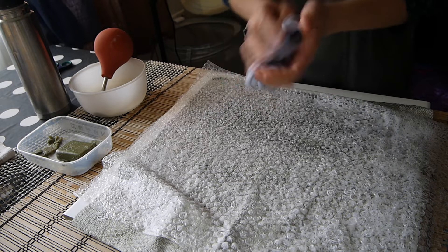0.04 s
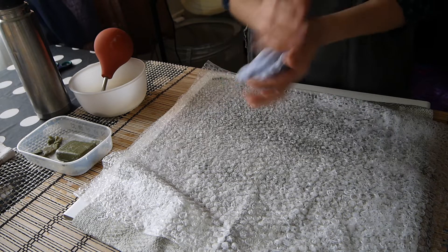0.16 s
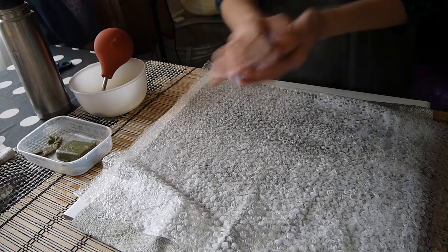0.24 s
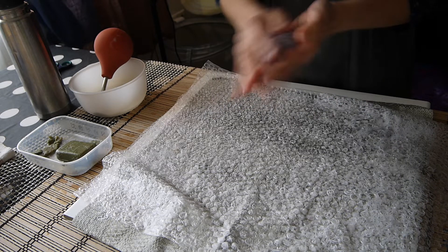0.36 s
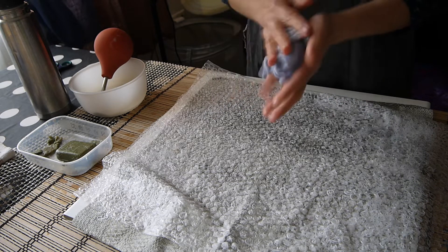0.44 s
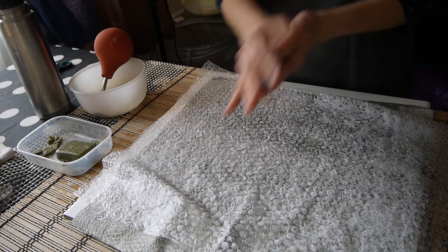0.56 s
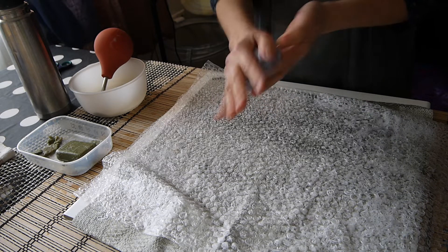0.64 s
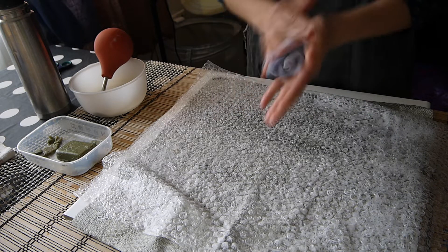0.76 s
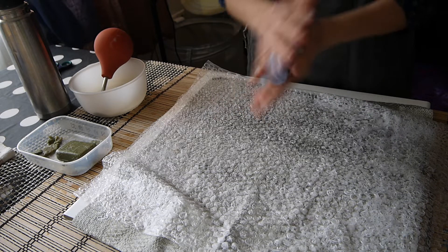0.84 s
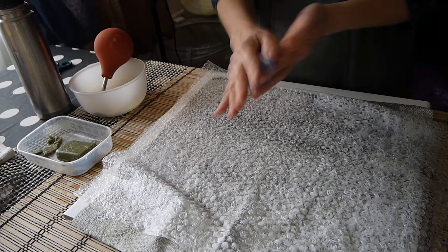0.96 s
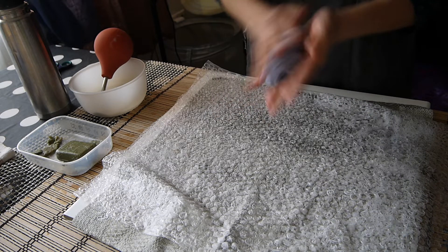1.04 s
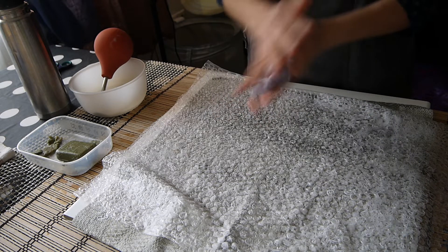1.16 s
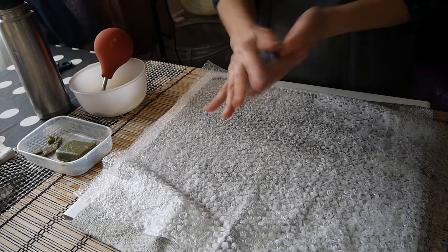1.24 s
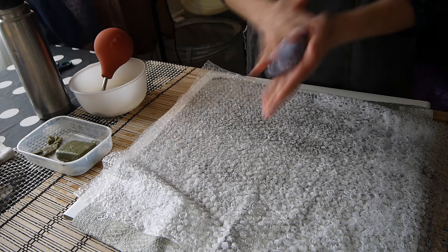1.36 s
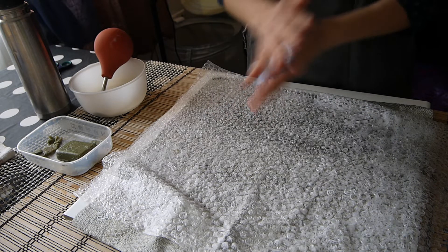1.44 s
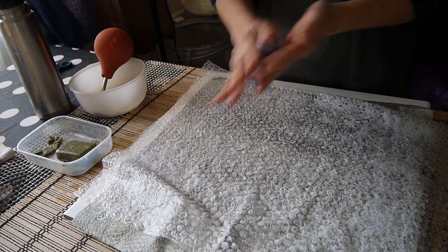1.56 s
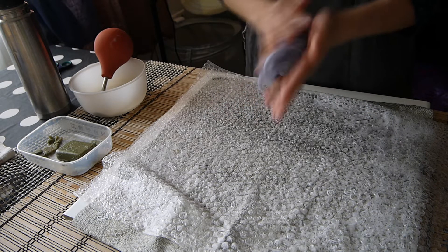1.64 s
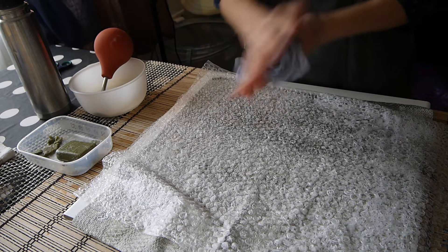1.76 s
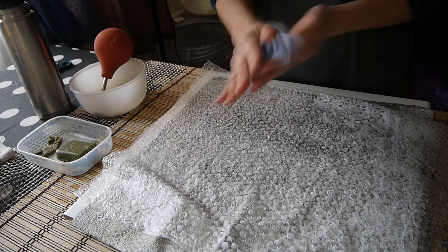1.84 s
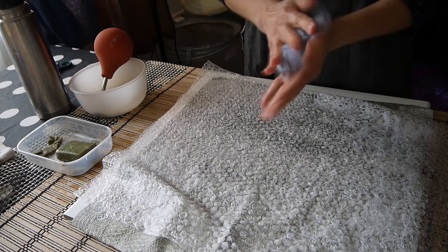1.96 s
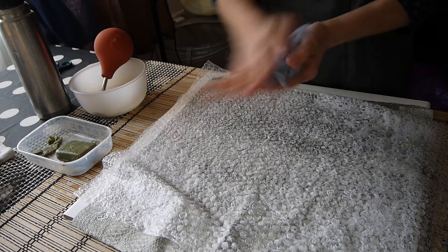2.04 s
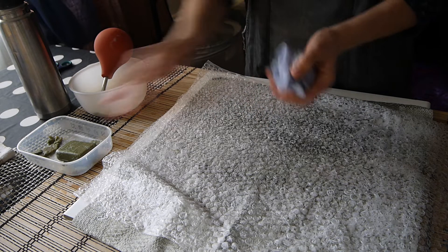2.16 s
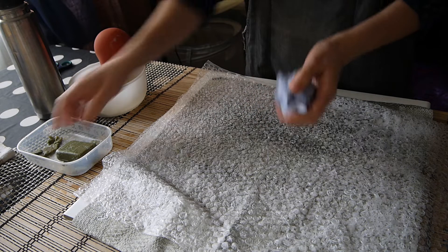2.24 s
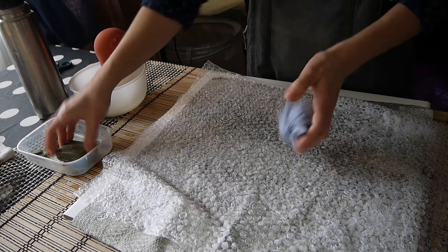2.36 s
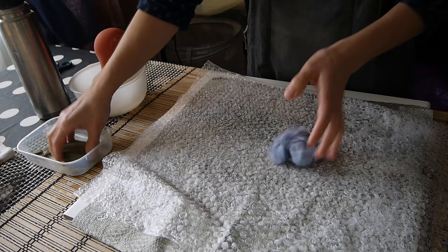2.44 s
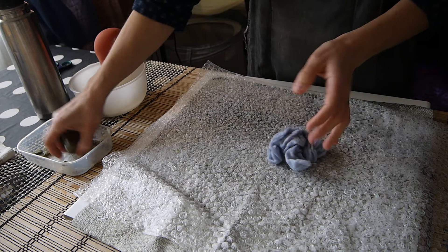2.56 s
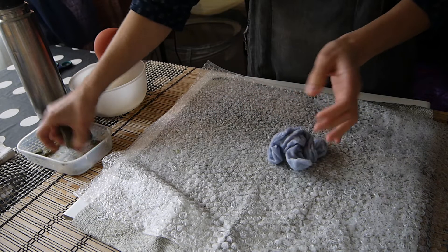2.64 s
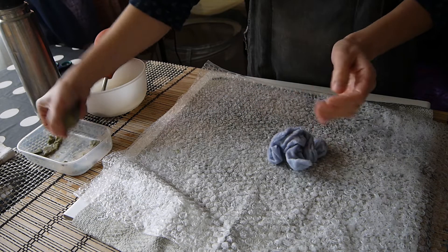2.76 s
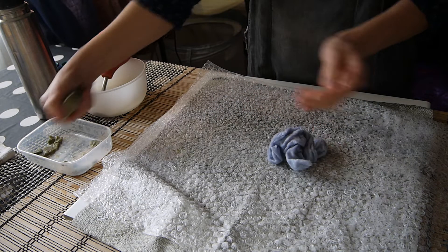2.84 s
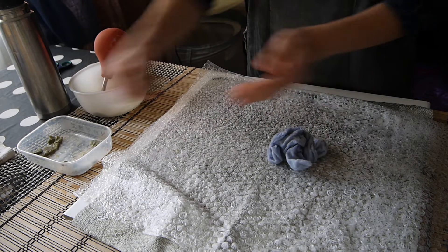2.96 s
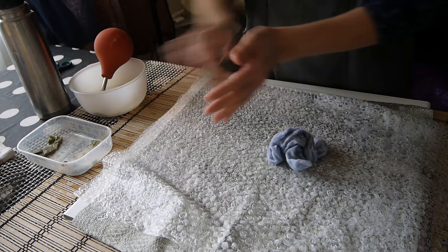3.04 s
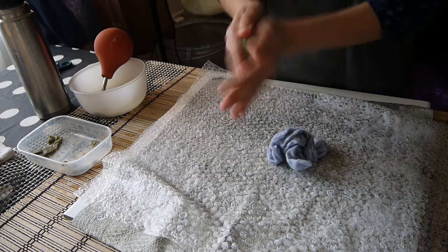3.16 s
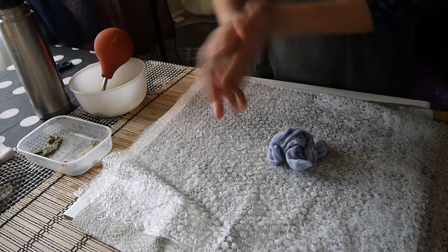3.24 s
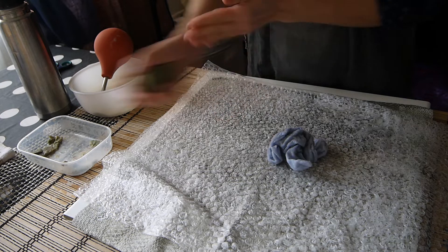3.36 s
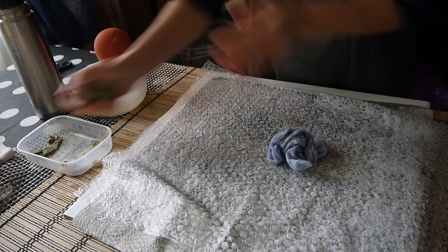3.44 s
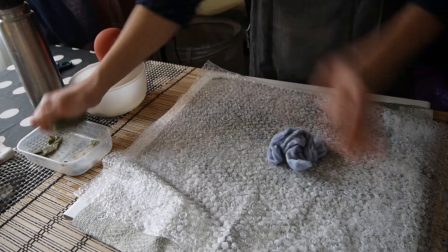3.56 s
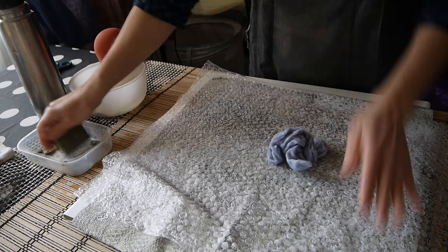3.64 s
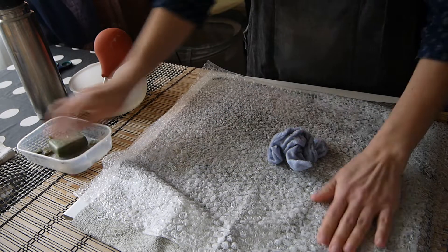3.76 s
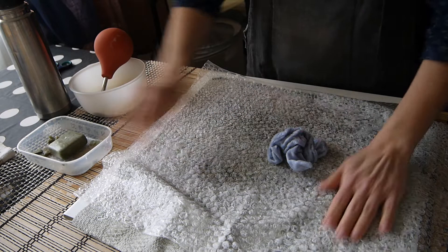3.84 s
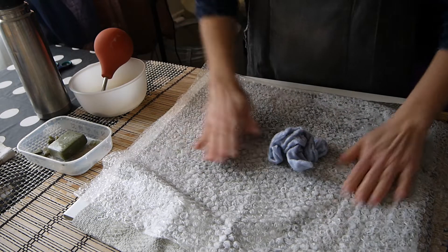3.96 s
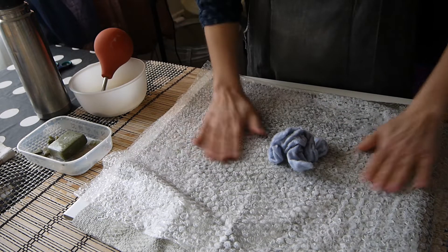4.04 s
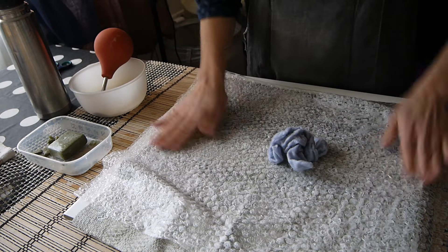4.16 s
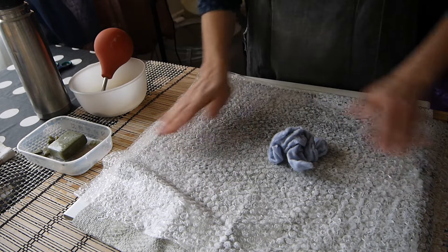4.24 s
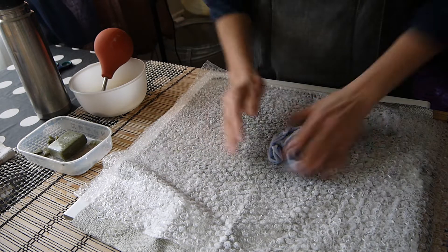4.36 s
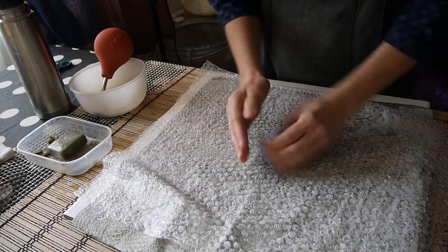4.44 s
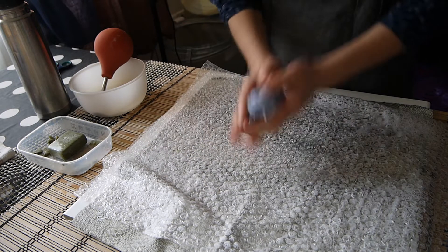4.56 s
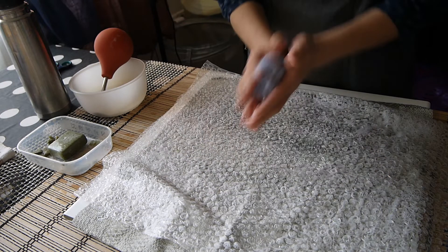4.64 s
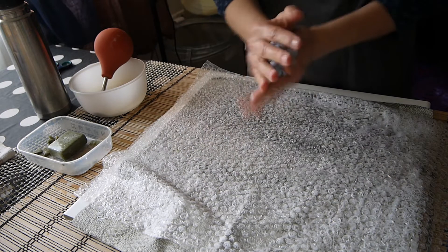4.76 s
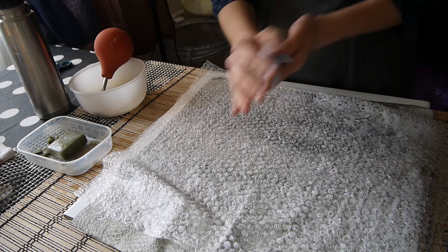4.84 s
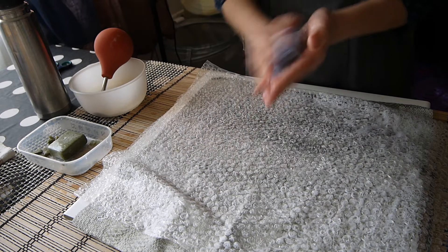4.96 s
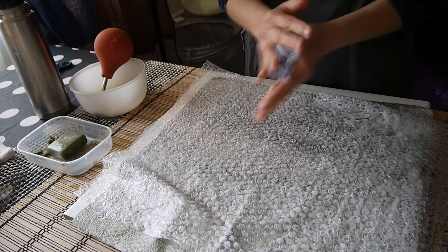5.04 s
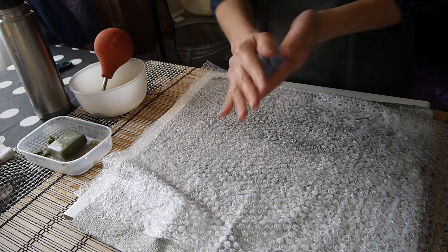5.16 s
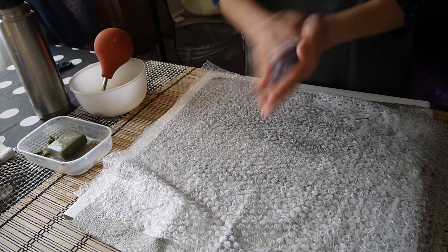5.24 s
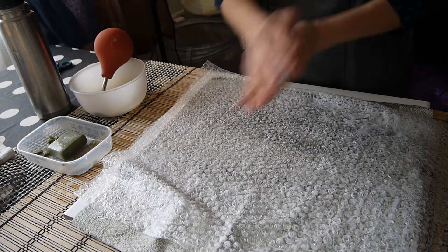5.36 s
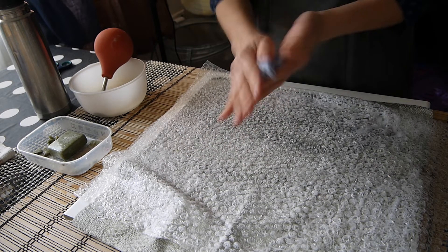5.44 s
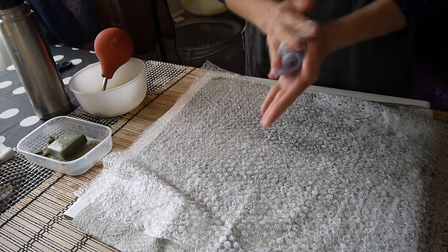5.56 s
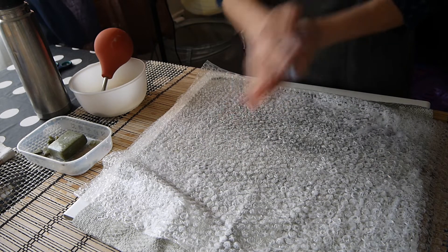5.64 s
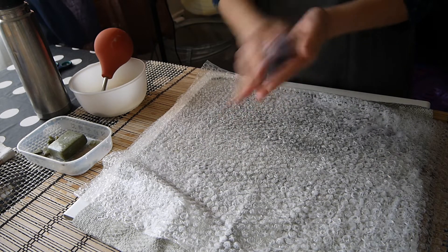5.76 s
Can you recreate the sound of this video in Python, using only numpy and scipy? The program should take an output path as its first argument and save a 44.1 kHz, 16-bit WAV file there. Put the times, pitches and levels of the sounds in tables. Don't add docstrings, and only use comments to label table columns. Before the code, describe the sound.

In a quiet room, close stereo microphones catch soapy palms rolling wet wool in quick soft hisses. Soap is lifted from a thin plastic dish on the left with small hollow knocks, lathered gently, then dropped back with a loud bouncing clatter and table thud. Palms brush a dry towel, then the quick rubbing returns over faint room tone.

```python
import sys
import numpy as np
from scipy import signal
from scipy.fft import rfft, irfft
from scipy.io import wavfile

SR = 44100
rng = np.random.default_rng(int(sys.argv[2]) if len(sys.argv) > 2 else 0)


def level_to_linear(level):
    exponent = np.asarray(level, float) / 20
    return 10 ** exponent


def transcribe(u):
    v = np.clip(np.atleast_2d(u).T, -1, 1)
    q = np.round(v * 32767).astype(np.int16)
    wavfile.write(sys.argv[1], SR, q)


N = 255339


def rms_one(x):
    return x / np.sqrt(np.mean(x ** 2) + 1e-20)


def at_hz(points, hz):
    table_hz, value = np.array(points).T
    return np.interp(np.log(hz), np.log(table_hz), value)


def filtered(x, order, hz, kind="low"):
    return signal.sosfilt(signal.butter(order, hz, kind, fs=SR, output="sos"), x)


def drift(rate):
    r = np.exp(-80 * np.pi * rate / SR)
    noise = rng.standard_normal(N // 40 + 2002)
    slow = signal.lfilter([1], [1, -2 * r, r * r], noise)[2000:]
    return np.interp(np.arange(N) / 40, np.arange(len(slow)), rms_one(slow))


def colour(x, spectrum):
    hz = np.maximum(np.arange(N // 2 + 1) * SR / N, 5)
    return rms_one(irfft(rfft(x) * level_to_linear(at_hz(spectrum, hz)), N))


def resonate(x, hz, width_hz):
    r = np.exp(-np.pi * width_hz / SR)
    poles = [1, -2 * r * np.cos(2 * np.pi * hz / SR), r * r]
    return signal.lfilter([(1 - r * r) / 2, 0, (r * r - 1) / 2], poles, x + 1e-18)


def grains(per_s, spread_db, clump_db):
    sizes = level_to_linear(spread_db * np.minimum(rng.exponential(1, N), 5)) * rng.choice([-1, 1], N)
    chance = per_s * level_to_linear(clump_db * drift(40)) / SR
    return sizes * (rng.random(N) < chance)


def burst(s, level_db, decay_ms, first=0.):
    out = np.zeros(N)
    start = round((s + .0008) * SR)
    t = np.arange(min(2000, N - start)) / SR
    chatter = rng.standard_normal(2000)[:len(t)]
    chatter[0] = first
    out[start:start + len(t)] = level_to_linear(level_db) * chatter * np.exp(-t * 1000 / max(decay_ms, .2))
    return out


def swing(s, db, hz, ms, rise_ms):
    out = np.zeros(N)
    start = round(s * SR)
    t = np.arange(4000) / SR
    envelope = np.exp(-t * 1000 / ms) * (1 - np.exp(-t * 1000 / rise_ms))
    out[start:start + len(t)] = level_to_linear(db) * np.sin(2 * np.pi * hz * t) * envelope
    return out


def swells(s, db, attack_ms, hold_ms, release_ms, sag_db=0.):
    power = 1e-12
    for at, top_db, rise, hold, fall in np.broadcast(s, db, attack_ms, hold_ms, release_ms):
        ms = 1000 * (np.arange(N) / SR - at)
        lost_db = 20 * (np.maximum(-ms, 0) / rise) ** 2
        lost_db += np.maximum(ms - hold, 0) * 20 / fall
        lost_db += np.clip(ms, 0, hold) * sag_db / 1000
        power = power + level_to_linear(2 * (top_db - lost_db))
    return np.sqrt(power)


def place(mid, side):
    return np.array([mid + side, mid - side])


def lean(db):
    return level_to_linear(np.array([[db], [-db]]) / 2)


# (middle [s], half length [ms], lather hiss [dB], pressure [dB])
STROKES = [(0.01, 21, -55, -67), (0.1, 74, -55.5, -60), (0.265, 49, -55.5, -63.5), (0.42, 61, -54, -62),
           (0.595, 62, -55, -60), (0.77, 66, -54.5, -61), (0.915, 52, -55, -60), (1.08, 68, -56, -62),
           (1.22, 45, -57, -58), (1.36, 86, -56.5, -62), (1.51, 67, -55, -59.5), (1.68, 49, -55.5, -59.5),
           (1.85, 88, -55, -59), (1.99, 49, -60, -68), (2.11, 86, -58.5, -60), (4.68, 230, -63.5, -74),
           (4.84, 96, -55.5, -60.5), (5.0, 61, -57, -62), (5.14, 97, -56.5, -58.5), (5.29, 55, -56, -62.5),
           (5.409, 44, -53, -56.5), (5.57, 69, -55, -59), (5.69, 28, -51.5, -55.5),
           (5.78, 82, -55.5, -58.5)]
PALMS_PART_S, PARTING_MS = 2.148, 13


def rolling():
    s, half_ms, hiss_db, pressure_db = np.transpose(STROKES)[:, :, None]
    t = np.arange(0, N + 40, 40) / SR
    bells = np.exp(-((t - s) * 1000 / half_ms) ** 2)
    parting = level_to_linear(-40 * np.maximum(t - PALMS_PART_S, 0) * 1000 / PARTING_MS)
    bells *= np.where(s < PALMS_PART_S, parting, 1)
    gains = [np.sqrt((level_to_linear(2 * db) * bells).sum(axis=0)) for db in (hiss_db, pressure_db)]
    return [np.interp(np.arange(N) / SR, t, gain) for gain in gains]


# (frequency [Hz], level [dB per Hz])
FRICTION = [(200, -13), (400, 1.5), (800, 3), (1600, -1.5), (2600, -2.5), (4000, -15.5)]


def rub(speed, pressure, spectrum, per_s):
    fizz = rms_one(grains(per_s, 3.0, 2.2)) + 0.89 * rng.standard_normal(N)
    hiss = speed * level_to_linear(0.48 * drift(29)) * colour(fizz, spectrum)
    aside = speed * level_to_linear(-8.0) * colour(rng.standard_normal(N), spectrum)
    drag = pressure * level_to_linear(0.5 * drift(28.3)) * colour(grains(4000, 1.6, 3.0), FRICTION)
    return place(hiss + drag, aside + 0.012 * hiss + 0.082 * drag)


# (time [s], hiss [dB], attack [ms], hold [ms], release [ms per 20 dB])
SOAPING = [
    (2.894, -73, 12, 2, 23),
    (3.075, -63.5, 180, 5, 30),
    (3.089, -50.5, 2.5, 4.7, 100),
    (3.212, -54, 24.7, 175, 22),
    (3.662, -59, 34, 3.1, 24),
]
# (time [s], hiss [dB], attack [ms], hold [ms], release [ms per 20 dB])
TOWEL = [
    (4.038, -49, 100, 32, 100),
    (4.125, -44.5, 144, 26.5, 100),
    (4.17, -41, 67, 14, 65.3),
    (4.434, -54, 14.8, 58, 109),
]
# (frequency [Hz], level [dB per Hz])
LATHER = [(1470, -24), (2500, -13), (2980, -6), (3440, -7.5), (4500, -3), (4890, -0.5), (6340, -5),
          (9880, 0), (12000, -3.5), (14400, -14), (15500, -54)]
# (frequency [Hz], level [dB per Hz])
TERRY = [(1200, -23), (2000, -5.5), (3000, -3), (5000, -2.5), (7000, -7), (10200, -4.5), (12500, -12),
         (14000, -23.5), (15500, -43.5)]
SOAP_DRAG_DB, TOWEL_DRAG_DB, TIRING_DB_PER_S = -4, -4.5, 29


def hands():
    hiss, pressure = rolling()
    soap = swells(*np.transpose(SOAPING), sag_db=TIRING_DB_PER_S)
    towel = swells(*np.transpose(TOWEL), sag_db=TIRING_DB_PER_S)
    wet = rub(hiss + soap, pressure + level_to_linear(SOAP_DRAG_DB) * soap, LATHER, 9000)
    return wet + rub(towel, level_to_linear(TOWEL_DRAG_DB) * towel, TERRY, 5090)


# (time [s], peak [dB], pitch [Hz], left-right [dB])
SNAPS = [(1.512, -42, 4810, 0.0), (2.2598, -34.5, 4450, -2.5), (3.101, -41, 4700, 0.5),
         (3.21, -37.5, 4100, -2), (3.24, -39, 3340, 0.5), (3.6925, -28, 2450, 15), (2.3544, -68, 7120, 7),
         (2.452, -44, 9840, 1.5), (2.585, -42, 6720, 6), (2.8927, -41.5, 10800, 5),
         (2.9796, -54, 7950, 0.5), (3.089, -36, 7500, 0.0), (3.644, -53, 9500, 7), (3.7005, -19, 10900, 11),
         (3.709, -23, 8850, 4.5), (3.7926, -17, 8200, 9), (3.864, -19, 9300, 8), (3.883, -27, 7900, 2),
         (4.043, -33, 4120, 0.1), (4.148, -37, 5000, 0.1), (4.276, -53, 9760, -3), (4.426, -40, 3310, -2),
         (4.5006, -42, 7000, -2), (3.873, -22, 9240, 9), (5.6768, -30, 8010, -2), (5.513, -42, 7300, 0.1)]
# (time [s], peak [dB], pitch [Hz], contact [ms])
SLAPS = [(1.224, -47, 581, 8.8), (1.227, -54, 1690, 4.3), (1.499, -50, 763, 8.1), (1.513, -52, 1620, 3.6),
         (1.795, -48.5, 960, 20), (1.829, -47, 640, 4.9), (2.091, -45, 720, 3.9),
         (2.2605, -45.5, 1500, 1.6), (3.09, -48, 525, 1.1), (3.104, -43, 400, 9.7), (4.431, -40, 458, 11),
         (4.433, -56, 780, 13), (5.399, -51, 740, 13), (5.676, -60, 516, 5.2)]


def smacks():
    out = np.zeros((2, N))
    for s, db, hz, pan_db in SNAPS:
        film = burst(s, db + 0.5, 1.0, 4.6)
        snap = resonate(resonate(film, hz, .8 * hz), hz, 1.2 * hz) + .05 * film
        out += snap * lean(pan_db)
    for s, db, hz, ms in SLAPS:
        push = burst(s, db + 12, ms, 7.9)
        out += resonate(push, hz, .3 * hz) - .3 * resonate(push, 2.2 * hz, .9 * hz)
    return out


# (time [s], dish ring [dB], hold [ms], release [ms per 20 dB], splash of wet scrape [dB])
SKIDS = [
    (2.435, -51, 5.4, 42.5, -61),
    (2.474, -45, 5, 240, -49.5),
    (2.587, -40, 3.7, 51, -57.5),
    (2.692, -46, 43, 60, -74),
    (2.725, -42, 9.9, 94, -81),
    (3.713, -30, 75, 242, -34),
    (3.804, -28, 20, 97, -35.5),
    (3.855, -23.5, 7, 24, -47),
    (3.886, -29.5, 49, 49, -28.5),
    (3.96, -45, 11.5, 196, -47),
]
# (time [s], peak [dB], crack re peak [dB], contact [ms], favoured pitch [Hz])
KNOCKS = [(2.421, -29.5, -17, 4.7, 1040), (2.4495, -35, -7, 2.4, 1110), (2.4728, -24, -10, 2.3, 1410),
          (2.477, -38, -23, 1.3, 1300), (2.482, -29, -15, 2.2, 1360), (2.4844, -37, -16, 1.2, 1250),
          (2.502, -25.5, -20, 1.9, 1630), (2.5097, -28, -16, 1.3, 1500), (2.545, -33, -24, 1.5, 1400),
          (2.59, -37, -16, 2.5, 2000), (2.5966, -32, -16, 1.5, 1300), (2.5775, -31, -31, 10, 1920),
          (2.588, -27, -21, 6, 1170), (2.6719, -14, -13.5, 3.9, 1140), (2.6756, -25, -31, 2.7, 1390),
          (2.681, -16, -29, 3.8, 1150), (2.696, -33, -42, 4.6, 1150), (2.704, -22, -43, 6.7, 1370),
          (2.717, -39, -43, 2.4, 1400), (2.7217, -33, -24, 2.1, 1250), (2.734, -19.5, -24, 7.7, 1300),
          (2.74, -36, -40, 3.3, 1250), (2.77, -31.5, -45, 4.1, 1700), (3.6947, 1.5, -6, 4.6, 2080),
          (3.699, -4, -16, 0.71, 1120), (3.7, -14, -13, 2.4, 1880), (3.722, -38, -16, 4.0, 1690),
          (3.757, -17, -20, 1.3, 2000), (3.7898, 1, -26, 7.3, 890), (3.795, -4, -19, 6.2, 1410),
          (3.828, -16, -30, 4.1, 890), (3.833, -10, -36, 2.5, 885), (3.843, -18, -18, 2.3, 1100),
          (3.858, -10, -35, 6.3, 1300), (3.864, -2.5, -18, 4.7, 1940), (3.883, -9, -33, 4.7, 1620),
          (3.89, -19, -23, 7.7, 1810), (3.914, -13, -33, 3.5, 1150), (3.925, -19, -15, 4.9, 1440)]
# (frequency [Hz], width [Hz], level [dB])
DISH = [(345, 270, -13), (478, 110, -7.5), (677, 130, -9.5), (893, 110, -4.5), (1032, 68, -6.5),
        (1120, 46, 0), (1350, 100, -1.5), (1620, 69, -4.5), (1810, 140, -5.5), (2080, 270, -5.5),
        (2520, 200, -9), (3100, 260, -8), (4450, 1160, -11), (4720, 260, -9)]
# (frequency [Hz], left-right [dB])
DISH_LEAN = [(60, 1.0), (180, 4), (550, -3.5), (1650, 9), (4970, 0.5), (15000, 2.5)]
# (frequency [Hz], level [dB per Hz])
SCRAPE = [(1470, -16.5), (2500, -9), (5120, -10.5), (6900, -18), (9880, -11), (12800, -16), (14400, -47.5),
          (15500, -103)]
SKID_ATTACK_MS, SPLASH_ATTACK_MS, SPLASH_RELEASE_MS = 28, 20, 65
WET_BELOW_RING_DB, CHATTER_DB = -24.5, -7
SOAP_SOFT_HZ = 2800


def dish():
    s, ring_db, hold_ms, release_ms, splash_db = np.transpose(SKIDS)
    ring = swells(s, ring_db, SKID_ATTACK_MS, hold_ms, release_ms)
    splash = swells(s, splash_db, SPLASH_ATTACK_MS, 0, SPLASH_RELEASE_MS)
    scrape = level_to_linear(WET_BELOW_RING_DB) * ring + splash
    blows = []
    for at, db, crack_db, ms, _ in KNOCKS:
        hardness = np.clip(level_to_linear(crack_db + 20), .1, 1)
        blows.append(burst(at, db + CHATTER_DB, ms, first=8 * hardness))
    blows = np.array(blows)
    slips = ring * level_to_linear(13.5) * rms_one(grains(600, 0.59, 5.9))
    favoured_hz = np.array(KNOCKS)[:, 4]
    out = np.zeros((2, N))
    for k, (hz, width_hz, db) in enumerate(DISH):
        octaves_off = np.log2(hz / favoured_hz)
        favour = level_to_linear(9.5 - 20.2 * np.minimum(octaves_off ** 2, .6))
        mode = resonate(favour @ blows + (-1) ** k * slips, hz, width_hz)
        out += level_to_linear(db) * lean(at_hz(DISH_LEAN, hz)) * mode
    out = level_to_linear(1.0) * filtered(out, 2, SOAP_SOFT_HZ)
    cracks = sum(burst(at, db + crack_db + 4, 1.12, 4.9) for at, db, crack_db, _, _ in KNOCKS)
    cracks = filtered(cracks, 2, [2800, 7000], "band")
    wet = scrape * colour(grains(3800, 0.76, 4.5), SCRAPE)
    aside = scrape * level_to_linear(-5.0) * colour(rng.standard_normal(N), SCRAPE)
    return out + place(cracks + wet, 0.18 * (cracks + wet) + aside)


# (time [s], peak [dB], pitch [Hz], ring [ms])
WALL_NOTES = [(2.4208, -40, 1164, 5), (2.4506, -33, 1120, 2.5), (2.4733, -26.5, 1370, 2.7),
              (2.4776, -40, 1430, 7), (2.4819, -40, 1120, 5), (2.502, -40, 1620, 5),
              (2.5095, -47, 1350, 12), (2.5452, -44, 1380, 19), (2.5764, -39, 1144, 14),
              (2.5792, -31, 1950, 3), (2.5903, -37, 2110, 3), (2.6721, -21.5, 1120, 9),
              (2.6725, -28, 1350, 7.1), (2.6768, -21.5, 1840, 3), (2.697, -30, 1120, 10),
              (2.7054, -31, 1720, 8), (2.7176, -34, 1170, 5), (2.7233, -32, 1860, 3),
              (2.7329, -29.5, 1400, 9.3), (2.737, -31, 915, 5.7), (2.7608, -42, 1735, 14),
              (2.8, -46, 1410, 7.2), (3.695, -10, 2100, 2.4), (3.6955, -11.5, 1120, 8),
              (3.7003, -12, 1996, 3.9), (3.7237, -20, 1090, 5.4), (3.7265, -19.5, 1700, 8.8),
              (3.7573, -21, 2040, 3), (3.7615, -31, 1080, 13), (3.7761, -34, 1120, 10),
              (3.7793, -29, 2090, 12), (3.79, -9, 877, 6), (3.7935, -13.5, 1385, 7.6),
              (3.795, -23, 3410, 6.6), (3.7984, -20, 1030, 5), (3.8011, -17.5, 750, 6.8),
              (3.8217, -19, 1430, 2.6), (3.8272, -20.5, 906, 8.7), (3.8572, -18, 1085, 3),
              (3.8624, -16, 1894, 8.4), (3.864, -19, 2480, 4), (3.8661, -16, 1400, 3.3),
              (3.8894, -25, 1350, 15), (3.8924, -20, 1900, 7.4), (3.9134, -26, 1130, 10),
              (3.925, -27.5, 2160, 7.2), (3.945, -34, 1350, 5), (3.978, -32, 2120, 4),
              (3.996, -36, 1390, 6)]
# (time [s], peak [dB], pitch [Hz], ring [ms])
SQUELCHES = [(1.2246, -45, 1440, 5.6), (1.226, -50, 2200, 3), (1.5032, -47, 814, 5), (1.512, -46, 1740, 3),
             (1.7948, -47, 842, 15), (1.7975, -51, 1060, 8), (1.797, -46, 2200, 4), (1.801, -51, 1490, 4),
             (2.2612, -34.5, 575, 3.4), (3.0905, -31.5, 570, 5.2), (3.099, -40, 420, 9.3),
             (3.101, -48, 990, 3), (4.432, -46, 850, 5), (4.4432, -48, 620, 3), (4.4555, -49, 820, 13),
             (4.4684, -51, 985, 15), (5.3939, -50, 820, 8), (5.4038, -45, 730, 13)]
WALL_LEAN_DB, SWING_RISE_MS = 5, 0.77


def notes():
    walls = sum(swing(*row, rise_ms=SWING_RISE_MS) for row in WALL_NOTES)
    wool = sum(swing(*row, rise_ms=SWING_RISE_MS) for row in SQUELCHES)
    return walls * lean(WALL_LEAN_DB) * level_to_linear(-1.0) + wool * level_to_linear(-1.5)


# (time [s], peak [dB], pitch [Hz], ring [ms])
BUMPS = [(1.742, -45, 133, 33), (2.42, -62, 210, 13), (2.581, -46, 262, 15), (2.717, -39.5, 269, 15.0),
         (3.09, -48, 180, 16), (3.696, -14.5, 230, 6.9), (3.794, -27, 207, 15), (4.056, -30, 237, 13.3),
         (4.435, -41, 170, 50), (3.97, -43, 200, 30), (3.703, -23.5, 686, 6.3), (4.077, -38.5, 148, 29),
         (4.107, -51, 186.5, 11.5), (4.164, -45, 330, 9.7), (2.422, -57, 310, 6.5), (2.475, -37, 477, 8),
         (2.672, -34, 480, 6.5), (2.672, -41, 685, 5), (2.421, -35, 556, 5), (2.587, -40, 503, 7),
         (2.465, -42, 182, 36), (2.72, -40, 345, 14), (3.6958, -10, 436, 6.4), (3.719, -17, 345, 9.5),
         (3.796, -31, 397, 11), (3.862, -49, 395, 8.5), (4.051, -35, 360, 9.3), (4.136, -35.5, 378, 39),
         (3.8, -27.5, 203, 14), (3.803, -22.5, 320, 24), (4.43, -38, 345, 14)]


def bumps():
    return level_to_linear(-4.5) * sum(swing(*row, rise_ms=.01) for row in BUMPS)


# (time [s], lowest mode [dB], upper modes [dB], release [ms per 20 dB])
LEANS = [(2.424, -57.5, -49, 112), (2.5, -57, -59, 100), (2.598, -56, -56, 38.5), (2.724, -53, -45, 92),
         (3.097, -62, -46, 81), (3.706, -36, -34.5, 118), (3.8, -49, -28.5, 60), (3.828, -40.5, -41, 98),
         (3.9, -47, -40, 35), (4.066, -41, -42.5, 80), (4.1, -39, -46, 60), (4.155, -44.5, -43.5, 62),
         (4.215, -43.5, -52, 37), (4.46, -52.5, -57, 55)]
# (frequency [Hz], width [Hz], level [dB])
TABLE = [(119, 26, -3), (191, 34, 12.5), (230, 27, 6), (337, 140, 10)]
BOARD_HZ = 105.1
LEAN_ATTACK_MS, BOARD_ATTACK_MS, BOARD_OUTLASTS = 17, 12, 1.15
SHAKE_BELOW_DB = -4


def table():
    s, board_db, upper_db, release_ms = np.transpose(LEANS)
    board = swells(s, board_db, BOARD_ATTACK_MS, 0, BOARD_OUTLASTS * release_ms)
    press = swells(s, upper_db, LEAN_ATTACK_MS, 0, release_ms) + level_to_linear(SHAKE_BELOW_DB) * rolling()[1]
    lowest = np.sqrt(2) * np.sin(2 * np.pi * np.cumsum(BOARD_HZ + 1.17 * drift(6.2)) / SR)
    lumps = rng.standard_normal(N) * level_to_linear(2 * drift(7.6))
    upper = rms_one(sum(level_to_linear(db) * resonate(lumps, hz, width_hz) for hz, width_hz, db in TABLE))
    return board * level_to_linear(2.5 * drift(11)) * lowest + press * upper


RUMBLE_HZ, RUMBLE_DB, RUMBLE_SIDE_DB = 70, -19.5, -27


def rumble():
    s, board_db, upper_db, release_ms = np.transpose(LEANS)
    shake = swells(s, np.maximum(board_db, upper_db), LEAN_ATTACK_MS, 0, release_ms)
    mid, side = filtered(rng.standard_normal((2, N)), 2, [18, RUMBLE_HZ], "band")
    return shake * place(level_to_linear(RUMBLE_DB) * rms_one(mid), level_to_linear(RUMBLE_SIDE_DB) * rms_one(side))


ROOM_T60_S, TREBLE_T60_S, WALL_CUT_HZ = 0.38, 0.042, 6400
ROOM_MID_DB, ROOM_SIDE_DB = -8, -13.5
ROOM_LOW_CUT_HZ = 150


def room(x):
    t = np.arange(SR // 2) / SR
    echoes = rng.standard_normal((2, len(t))) * (t > .004) / np.sqrt(.02 * SR)
    dull = filtered(echoes, 1, WALL_CUT_HZ)
    echoes = dull * level_to_linear(-60 * t / ROOM_T60_S) + (echoes - dull) * level_to_linear(-60 * t / TREBLE_T60_S)
    x = filtered(x, 2, ROOM_LOW_CUT_HZ, "high")
    mid, side = signal.fftconvolve(x[None], echoes, axes=1)[:, :N]
    side = filtered(side, 1, 400, "high")
    return place(level_to_linear(ROOM_MID_DB) * mid, level_to_linear(ROOM_SIDE_DB) * side)


# (frequency [Hz], level [dB per Hz])
AIR_MID = [(20, -26), (40, -22.5), (85, -20.5), (110, -14), (250, -12), (450, -14.5), (750, -17),
           (1200, -22), (2000, -27), (3500, -34.5), (4200, -29.5), (6000, -35), (10000, -34.5),
           (13000, -42), (15800, -50)]
# (frequency [Hz], level [dB per Hz])
AIR_SIDE = [(20, -43), (100, -15.5), (250, -7), (450, -6), (800, -2.5), (1300, -3.5), (2100, -13),
            (3000, -19.5), (5200, -24.5), (10000, -30.5), (13000, -36.5), (15800, -48)]
AIR_MID_DB, AIR_SIDE_DB = -57, -51.5
HUM_HZ, HUM_DB = 325.7, -70
WHINE_HZ, WHINE_DB, WHINE_SIDE_DB = 15625, -82, -79


def room_tone():
    mid = level_to_linear(AIR_MID_DB + .5 * drift(5.6)) * colour(rng.standard_normal(N), AIR_MID)
    side = level_to_linear(AIR_SIDE_DB + .5 * drift(9.1)) * colour(rng.standard_normal(N), AIR_SIDE)
    hum = level_to_linear(HUM_DB) * rms_one(resonate(rng.standard_normal(N), HUM_HZ, 2.0))
    whine = np.sin(2 * np.pi * WHINE_HZ * np.arange(N) / SR)
    return place(mid + hum + level_to_linear(WHINE_DB) * whine, side + level_to_linear(WHINE_SIDE_DB) * whine)


LOW_CUT_HZ, TOP_CUT_HZ = 103, 11200
NOTES_ECHO_SHARE = 0.4


def scene():
    near = hands() + smacks() + dish() + table() + bumps()
    rings = notes()
    echoes = room((near + NOTES_ECHO_SHARE * rings).mean(axis=0))
    heard = filtered(near + rings + echoes, 4, LOW_CUT_HZ, "high")
    return filtered(heard, 2, TOP_CUT_HZ) + room_tone() + rumble()


def roll_off(x):
    return signal.sosfilt(signal.butter(12, 16420, fs=SR, output="sos"), x)


LIMIT, LEFT_PORT_DB, RECORDER_TOP_HZ, OFFSET = 1.0, .3, 15750, -.003


def record(dry):
    rounded = LIMIT * np.tanh(dry * level_to_linear([[LEFT_PORT_DB], [0]]) / LIMIT)
    top_cut = signal.ellip(10, .5, 70, RECORDER_TOP_HZ, fs=SR, output="sos")
    mix = signal.sosfilt(top_cut, rounded) + OFFSET
    return roll_off(mix)


dry = scene()
out = record(dry)
transcribe(out)
```